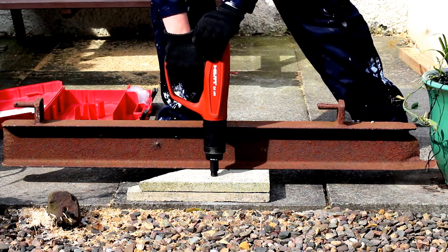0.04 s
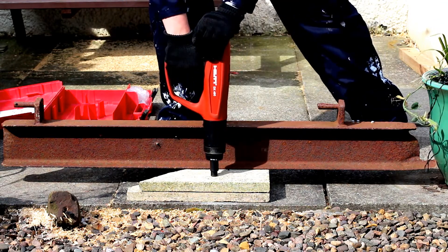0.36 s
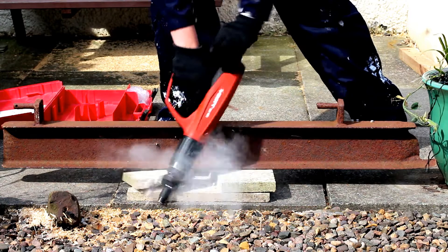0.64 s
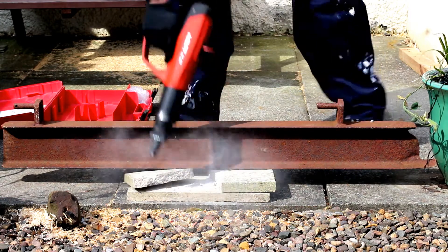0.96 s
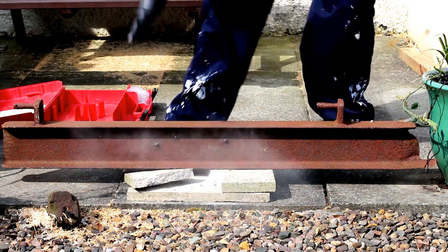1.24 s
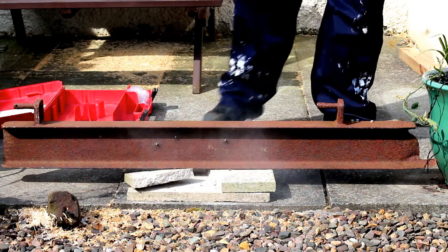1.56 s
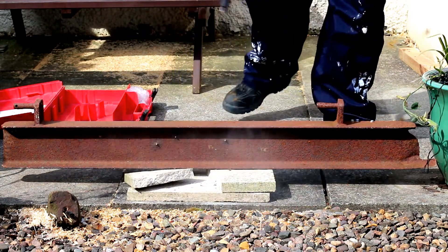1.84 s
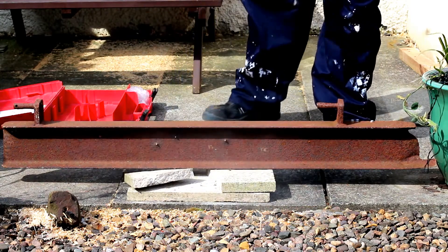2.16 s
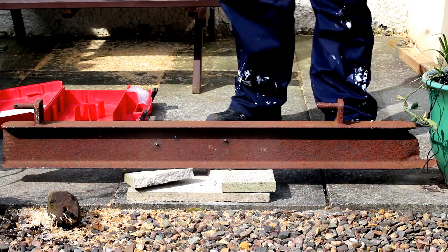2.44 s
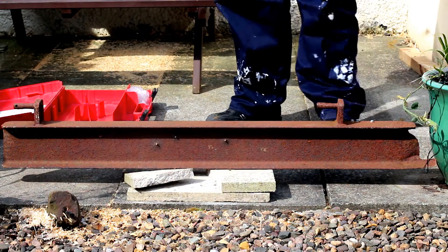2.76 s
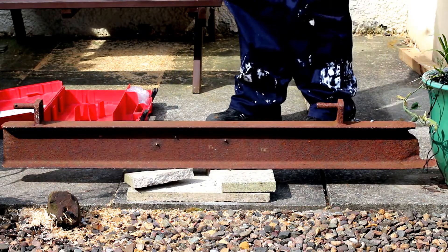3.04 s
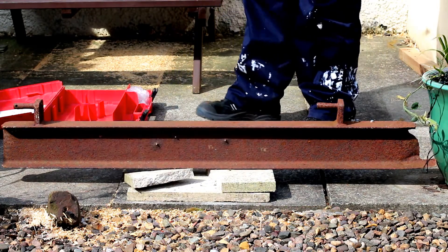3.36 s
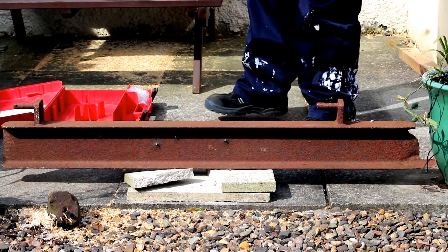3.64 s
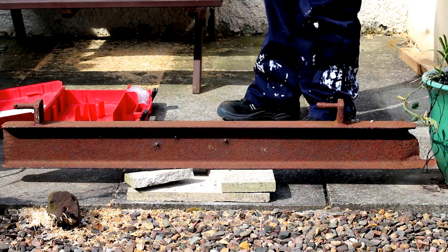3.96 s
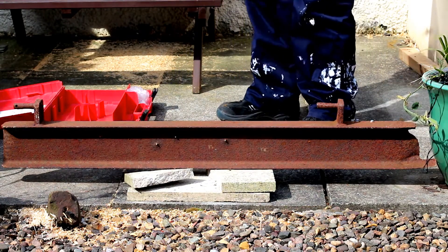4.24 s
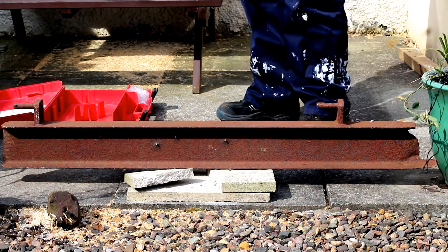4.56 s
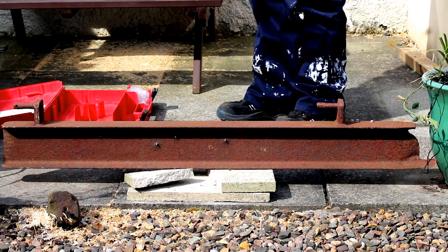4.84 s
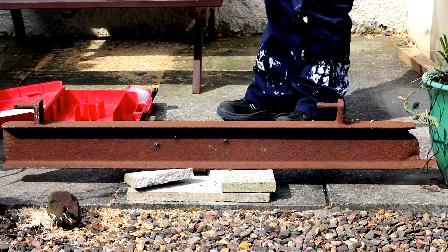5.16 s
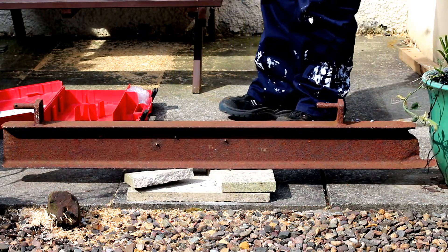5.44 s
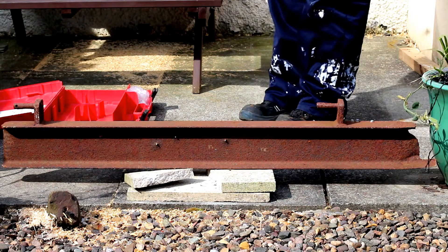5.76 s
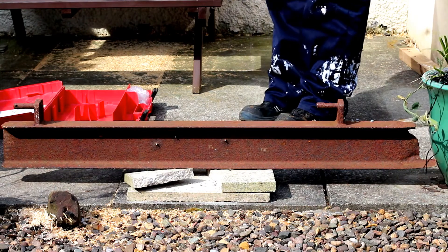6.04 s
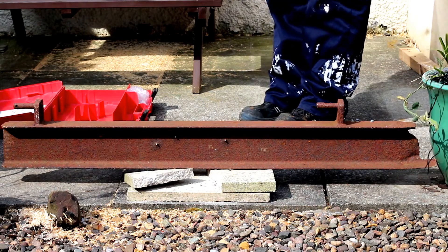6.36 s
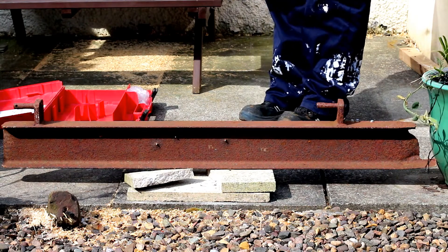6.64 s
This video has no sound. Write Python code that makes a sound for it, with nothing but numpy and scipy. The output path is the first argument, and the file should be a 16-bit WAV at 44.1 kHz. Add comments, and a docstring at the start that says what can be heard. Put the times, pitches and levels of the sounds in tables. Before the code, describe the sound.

A single loud nail gun shot bangs out close by, with a short echo and a fading metallic ring. Right after it, a split stone slab knocks, chips clack and bounce on the patio, and fine grit patters down. A couple of soft boot scuffs follow. Quiet faraway traffic and a breeze rumbling on the microphone lie underneath and fill the remaining seconds.

```python
"""A powder-actuated nail gun fires into a paving slab: the pin snaps, the charge blasts, steel rings on.
The slab splits and drops back, a chunk cracks down, chips bounce and grit patters; then a boot shuffles.
Patio walls and houses return the blows. Distant traffic and a breeze lie beneath.
The camera overloads on the shot and its gain control ducks and recovers."""
import sys
import numpy as np
from scipy import signal
from scipy.fft import rfft, irfft, next_fast_len
from scipy.io import wavfile
from scipy.ndimage import uniform_filter1d, map_coordinates

SR = 44100
rng = np.random.default_rng(int(sys.argv[2]) if len(sys.argv) > 2 else 0)


def wav_out(sig):
    """Save sig, one row per channel (or a flat mono array), as 16-bit PCM at SR to the path in sys.argv[1]."""
    wavfile.write(sys.argv[1], SR, np.round(np.clip(np.atleast_2d(sig).T, -1, 1) * 32767).astype(np.int16))


N = 295029
TIME_S = np.arange(N) / SR


def amp(db):
    """Decibels to gain."""
    return 10 ** (np.asarray(db) / 20)


def unit_rms(x):
    """x at rms 1."""
    return x / np.sqrt(np.mean(x ** 2) + 1e-20)


def at_hz(rows, hz):
    """(Hz, value) rows read on a log axis."""
    knots_hz, values = np.transpose(rows)
    return np.interp(np.log(hz + 1), np.log(knots_hz + 1), values)


def curve(rows):
    """(s, value) rows as one value per sample."""
    return np.interp(TIME_S, *np.transpose(rows))


def wobble(rate_hz):
    """Smooth curve through random knots."""
    return map_coordinates(rng.standard_normal(int(N * rate_hz / SR) + 4), [TIME_S * rate_hz])


def filtered(x, response):
    """x through a gain that depends on frequency."""
    size = next_fast_len(N + SR // 2)
    return irfft(rfft(x, size) * response(np.fft.rfftfreq(size, 1 / SR)), size)[..., :N]


def add(track, start_s, sound):
    """Mix a sound into a track."""
    part = track[..., round(start_s * SR):][..., :sound.shape[-1]]
    part += sound[..., :part.shape[-1]]


def mid_side(likeness, hz):
    """Mid and side gains for a left-right likeness."""
    angle = np.arccos(np.clip(at_hz(likeness, hz), -1, 1)) / 2
    return np.array([np.cos(angle), np.sin(angle)])


def stereo_noise(spectrum, likeness):
    """Coloured noise at rms 1 with a left-right likeness."""
    white = rng.standard_normal((2, N))
    mid, side = filtered(white, lambda hz: amp(at_hz(spectrum, hz)) * mid_side(likeness, hz))
    return unit_rms(np.array([mid + side, mid - side]))


def impact(colour_db, t60_s, size=8192):
    """A dying burst of micro-impacts through a body's colour, with the energy of 5 ms at rms 1."""
    t = np.arange(size) / SR
    burst = rfft(rng.standard_normal(size) * amp(-60 * t / t60_s))
    flattened = burst / np.sqrt(np.abs(burst) * uniform_filter1d(np.abs(burst), size=40))
    cepstrum = irfft(np.log(amp(colour_db(np.fft.rfftfreq(size, 1 / SR))) + 1e-6))
    body = np.exp(rfft(2 * cepstrum * (t > 0) * (t < t[size // 2])))  # causal: rings only after the blow
    sound = irfft(flattened * body)[:size // 2]
    return sound / np.linalg.norm(sound) * np.sqrt(.005 * SR)


# Sound from all around. Each row: frequency in Hz, left-right likeness from -1 to 1.
DIFFUSE_LIKENESS = [(100, 1), (380, 0.91), (950, 0.86), (2400, 0.32), (6000, -0.21), (15000, -.05)]

def echoes(decay, build_s, low_cut_hz=226):
    """A stereo tail of wall reflections that builds up, then dies at each band's own rate."""
    hz, t, bands = signal.stft(rng.standard_normal((2, SR)), SR, nperseg=256)
    bands = bands * amp(-60 * t / at_hz(decay, hz)[:, None]) * mid_side(DIFFUSE_LIKENESS, hz)[..., None]
    onset = 1 - np.exp(-(TIME_S[:SR] / build_s) ** 2)
    mid, side = signal.istft(bands, SR, nperseg=256)[1][:, :SR] * onset
    low_cut = signal.butter(N=3, Wn=low_cut_hz, btype="high", fs=SR, output="sos")
    tail = signal.sosfilt(low_cut, [mid + side, mid - side])
    return tail / np.linalg.norm(tail[0])


# Echo decay, near and far. Each row: frequency in Hz, t60 in seconds.
NEAR_DECAY = [(100, .1), (400, .22), (2000, 0.35), (6000, 0.14), (14000, 0.1)]
FAR_DECAY = [(100, 0.46), (400, .65), (1500, 0.61), (4000, 0.65), (8000, 0.55), (14000, 0.4)]

def patio(sound, pan_db, near_db, far_db, lag_samples_per_db=0.34):
    """Direct sound plus echoes from ground and near walls, and from the houses around."""
    response = amp(near_db) * echoes(NEAR_DECAY, build_s=.004)
    response += amp(far_db) * echoes(FAR_DECAY, build_s=.026)
    side_db = np.array([[pan_db], [-pan_db]]) / 2
    lag = np.sinc(np.arange(-6, 7) + lag_samples_per_db * side_db)  # the nearer port hears it sooner
    add(response, 0, amp(side_db) * lag)
    return signal.fftconvolve(sound[None], response, axes=1)


# Traffic swell. Each row: time in seconds, relative level in dB.
TRAFFIC_LEVEL = [(1.4, -45.5), (1.43, -45), (2.03, -46.5), (3.11, -45), (3.89, -46.5), (3.92, -45),
                 (4.79, -46.5), (6.36, -46), (6.57, -47), (6.6, -46.5), (6.69, -46)]
# Traffic colour. Each row: frequency in Hz, relative density in dB.
TRAFFIC_SPECTRUM = [(53, -25.5), (90, -4), (136, -4.5), (172, -8.5), (238, -4.5), (289, -7), (367, -9.5),
                    (446, -9), (497, -9), (644, -11), (1010, -9), (2570, -26.5), (7100, -36.5),
                    (12200, -44), (15800, -49)]

def traffic():
    """Distant traffic hums almost steadily from all around."""
    level_db = curve(TRAFFIC_LEVEL) + 5.5 + 0.25 * wobble(rate_hz=5)
    return amp(level_db) * stereo_noise(TRAFFIC_SPECTRUM, DIFFUSE_LIKENESS) * amp([[.3], [-.3]])


# Gusts. Each row: time in seconds, relative level in dB.
BREEZE_LEVEL = [(0, -36.5), (.25, -41.5), (.5, -41.5), (1.3, -45), (1.62, -42), (1.9, -41.5), (2.05, -45),
                (2.3, -39), (2.5, -44), (3.05, -45.5), (3.7, -44), (4.3, -44), (5.5, -48.5), (6.1, -46.5),
                (6.69, -48)]
# Wind rumble. Each row: frequency in Hz, relative density in dB.
BREEZE_SPECTRUM = [(15, -20), (28, -13.5), (42, 1.5), (55, -5), (100, -6), (160, -16.5), (300, -30.5),
                   (800, -58), (3000, -120)]
# Single eddies. Each row: centre in seconds, frequency in Hz, left peak in dB, right peak in dB.
EDDY_BUMPS = [(1.802, 85, -25, -17.5), (1.888, 100, -22, -16.5), (2.261, 65, -21, -36),
              (2.283, 80, -21.5, -27), (2.337, 80, -25, -20), (2.354, 80, -11, -19)]

def breeze():
    """Wind buffets each microphone port on its own; an eddy sucks at one and presses on the other."""
    buffeting = amp(1.1 * np.array([wobble(rate_hz=15), wobble(rate_hz=6.7)]))
    rumble = unit_rms(buffeting * stereo_noise(BREEZE_SPECTRUM, likeness=[(40, .13), (150, .2)]))
    out = amp(curve(BREEZE_LEVEL) + 2) * rumble * amp([[1.2], [-1.2]])
    for centre_s, hz, left_db, right_db in EDDY_BUMPS:
        phase_squared = (np.pi * hz * (TIME_S - centre_s)) ** 2
        bump = (1 - 2 * phase_squared) * np.exp(-phase_squared)
        out += np.outer([-amp(left_db), amp(right_db)], bump)
    return out


# Scuffs. Each row: start in seconds, level in dB, t60 in seconds, tilt above 2 kHz in dB per octave.
BOOT_SCUFFS = [(1.705, -42, 0.096, -9), (1.783, -57.5, .03, 4), (1.993, -41.5, 0.046, -1.5),
               (2.085, -58, .04, 4)]
# Sole on paving. Each row: frequency in Hz, relative density in dB.
SOLE_SPECTRUM = [(800, -16), (2000, -2.5), (3200, -1.5), (7000, -5), (15000, -12)]

def boot():
    """A sole scuffs and ticks on the gritty paving."""
    out = np.zeros((2, N))
    for start_s, db, t60_s, tilt_db in BOOT_SCUFFS:
        colour_db = lambda hz: at_hz(SOLE_SPECTRUM, hz) + tilt_db * np.log2(np.maximum(hz / 2000, 1))
        scuff = impact(colour_db, t60_s)
        add(out, start_s, amp(db) * patio(scuff, pan_db=-0.5, near_db=-2, far_db=-14.5))
    return out


# Falling grit. Each row: time in seconds, level in dB.
GRIT_LEVEL = [(1.15, -65.5), (1.24, -67), (1.265, -51.5), (1.3, -56.5), (1.37, -77.5), (1.43, -64.5),
              (1.48, -61), (1.56, -71), (1.75, -100)]
# Grain colour. Each row: frequency in Hz, relative density in dB.
GRIT_SPECTRUM = [(500, -50), (2000, -13), (6000, -5.5), (9500, -2), (11500, -10.5), (13000, -15.5),
                 (15500, -25.5)]

def grit(grains_per_s=4000):
    """Fine grains rain down after the chips."""
    landings = rng.random(N) < grains_per_s / SR
    grains = landings * rng.standard_normal(N) * amp(rng.normal(0, 2.5, (2, N)))
    patter = unit_rms(filtered(grains, lambda hz: amp(at_hz(GRIT_SPECTRUM, hz))))
    return amp(curve(GRIT_LEVEL)) * (TIME_S > GRIT_LEVEL[0][0]) * patter


# Chip landings. Each row: start in seconds, level in dB, t60 in seconds, left over right in dB,
# ring frequency in Hz, relative ring strength in dB.
CHIP_HITS = [(0.6105, -15, .012, 3, 3800, 2.5), (0.6643, -20, 0.03, 0, 3060, 25),
             (.8558, -30.5, 0.022, 4.5, 6000, -5), (.9215, -34.5, 0.027, 9.5, 2900, 1),
             (.9562, -29.5, .03, -3.5, 5440, -6), (.9908, -26, .02, 6, 2310, 8),
             (1.039, -38, 0.025, 1.5, 4500, 6), (1.087, -32, 0.027, 6, 5500, -11),
             (1.1183, -19, 0.028, 1.5, 4000, -4), (1.1219, -19, 0.021, 4, 6400, 4),
             (1.155, -33, 0.068, 2, 7000, -11), (1.2302, -26, 0.074, 4.5, 2750, 6),
             (1.262, -36.5, 0.045, 4, 9700, 11), (1.4447, -48, .02, 8, 8000, -10),
             (1.4762, -50, .025, 1.5, 11400, 22), (1.516, -54, .02, 4, 5200, -3.5)]
# Chip colour. Each row: frequency in Hz, relative density in dB.
CHIP_SPECTRUM = [(410, -47), (700, -23), (1390, -11), (1750, -8), (2580, -9), (4200, -5.5), (5820, -10.5),
                 (6940, -10.5), (10200, -17.5), (12000, -29), (15000, -36)]

def chips(ring_width=.08):
    """Each flying chip clacks on the paving and rings at a pitch set by its size."""
    out = np.zeros((2, N))
    for start_s, db, t60_s, pan_db, ring_hz, ring_db in CHIP_HITS:
        def colour_db(hz):
            resonance = amp(ring_db + 6.5) / (1 + ((hz / ring_hz - 1) / ring_width) ** 2)
            stone_db = at_hz(CHIP_SPECTRUM, hz) - at_hz(CHIP_SPECTRUM, ring_hz)
            return stone_db + 20 * np.log10(1 + resonance)
        clack = impact(colour_db, t60_s)
        add(out, start_s, amp(db) * patio(clack, pan_db, near_db=-7.5, far_db=-17.5))
    return out


# Stone modes. Each row: frequency in Hz, level in dB, t60 in seconds.
CHUNK_MODES = [(328, -28.5, .06), (870, -14, 0.014), (1260, -14, 0.021), (1530, -6.5, 0.02),
               (2270, -11.5, 0.02), (2660, -10.5, .012), (3170, -4.5, .012), (4100, -6, .007),
               (4600, -7, 0.0075), (5500, -2.5, 0.0067), (6400, -6.5, 0.0041)]
# Its edge on the paving. Each row: frequency in Hz, relative density in dB.
EDGE_SPECTRUM = [(200, -26), (1000, -3), (5500, 1), (8000, -10), (15000, -26)]

def chunk(start_s=1.0036, rock_s=.0052, pan_db=-1.7):
    """One hard contact sets short stone modes ringing; the chunk rocks and touches again."""
    out, t = np.zeros((2, N)), TIME_S[:SR // 10]
    crack = sum((-1) ** k * amp(db - 60 * t / t60_s) * np.sin(2 * np.pi * hz * t)
                for k, (hz, db, t60_s) in enumerate(CHUNK_MODES))
    add(crack, 0, amp(-18.5) * impact(lambda hz: at_hz(EDGE_SPECTRUM, hz), t60_s=.0035))
    add(out, start_s, patio(crack, pan_db, near_db=-12, far_db=-18.5))
    add(out, start_s + rock_s, amp(-14.5) * patio(crack, pan_db, near_db=-11, far_db=-16))
    return out


# Slab landings. Each row: start in seconds, level in dB, t60 in seconds, left over right in dB.
SLAB_DROPS = [(0.7236, -8.5, 0.024, -1), (.788, -24, .04, 4)]
# Slab colour. Each row: frequency in Hz, relative density in dB.
SLAB_SPECTRUM = [(90, -49), (180, -16.5), (330, -9.5), (455, 2.5), (600, -1), (880, -12.5), (1310, -2.5),
                 (1900, -7), (3100, -12.5), (3850, -21), (4400, -15.5), (6000, -24), (9050, -18.5),
                 (14000, -42.5)]

def slab():
    """The broken slab knocks on the one beneath."""
    out = np.zeros((2, N))
    for start_s, db, t60_s, pan_db in SLAB_DROPS:
        knock = impact(lambda hz: at_hz(SLAB_SPECTRUM, hz), t60_s)
        add(out, start_s, amp(db) * patio(knock, pan_db, near_db=-5.5, far_db=-14))
    return out


def squeal(start_s=.5705, end_s=.59, hz=10100, db=-15):
    """A thin metallic squeal follows the blast."""
    gate = uniform_filter1d(((TIME_S > start_s) & (TIME_S < end_s)).astype(float), size=120)
    return amp(db) * gate * np.sin(2 * np.pi * hz * TIME_S + .7 * wobble(rate_hz=300))


# Steel modes. Each row: frequency in Hz, level in dB, t60 in seconds.
STEEL_MODES = [(433, -25, .55), (517, -25, .5), (1310, -34, .6), (1580, -30, 0.93), (1770, -24, 1.002),
               (1800, -23, 1.05), (2196, -26, .9), (2530, -29, .8), (2772, -24, 0.87), (3046, -26, 0.83),
               (3111, -22.5, 0.91), (3607, -30.5, .6), (4287, -39, .8), (5823, -45.5, 1.0),
               (8230, -51.5, .9), (10050, -31.5, .55)]

def steel(start_s, attack_s=.006):
    """The shot sets the tool and the beam beside it ringing."""
    out, t = np.zeros((2, N)), TIME_S[:2 * SR]
    for hz, db, t60_s in STEEL_MODES:
        phase = rng.uniform(0, 2 * np.pi) + rng.normal(0, .4, (2, 1))
        envelope = amp(db - 60 * t / t60_s) * (1 - np.exp(-t / attack_s))
        add(out, start_s, envelope * np.sin(2 * np.pi * hz * t + phase))
    return out


# Pin, charge, piston, wall slap. Each row: start in seconds, level in dB, t60 in seconds.
SHOT_BLOWS = [(0.5496, -16.5, 0.053), (0.5536, 11.5, 0.013), (.5572, 0.5, 0.0056), (0.571, -4, .02)]
# Blast colour. Each row: frequency in Hz, relative density in dB.
BLAST_SPECTRUM = [(24, -44.5), (45, -23), (110, -8.5), (200, -1), (340, 1.5), (500, -4.5), (700, -5),
                  (1130, -2), (2450, -6.5), (3080, -6), (3850, -7), (5700, -12), (8500, -15), (15500, -33)]

def nail_gun():
    """The pin snaps, the charge fires, the piston slams home and a wall slaps back."""
    out = np.zeros((2, N))
    for start_s, db, t60_s in SHOT_BLOWS:
        bang = impact(lambda hz: at_hz(BLAST_SPECTRUM, hz), t60_s)
        add(out, start_s, amp(db) * patio(bang, pan_db=1, near_db=-9.5, far_db=-15))
    return out


def scene():
    """Everything that reaches the camera."""
    charge_s = SHOT_BLOWS[1][0]
    shot = nail_gun() + steel(charge_s) + squeal()
    debris = slab() + chunk() + chips() + grit()
    return shot + debris + boot() + traffic() + breeze()


def gain_control(x, threshold_db, release_db_per_s, attack_s):
    """Peaks over the threshold pull the gain down fast; it creeps back at a steady rate."""
    rms = np.sqrt(np.abs(uniform_filter1d(np.mean(x ** 2, axis=0), size=88)))
    over_db = np.maximum(20 * np.log10(rms + 1e-9) - threshold_db, 0)
    release_db = release_db_per_s * TIME_S
    held_db = np.maximum.accumulate(over_db + release_db) - release_db
    pole = np.exp(-1 / (attack_s * SR))
    return x * amp(-signal.lfilter([1 - pole], [1, -pole], held_db))


def record(dry):
    """The camera ducks its gain, clips what gets through and cuts everything above its band limit."""
    band_limit_hz = 15830
    ducked = gain_control(dry, threshold_db=-1, release_db_per_s=46.5, attack_s=.002)
    clipped = np.clip(ducked, -1, 1)
    return filtered(clipped, lambda hz: 1 / (1 + (hz / band_limit_hz) ** 120))


dry = scene()
out = record(dry)
wav_out(out)
```